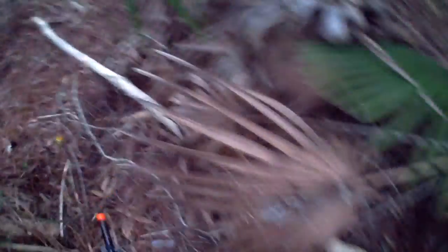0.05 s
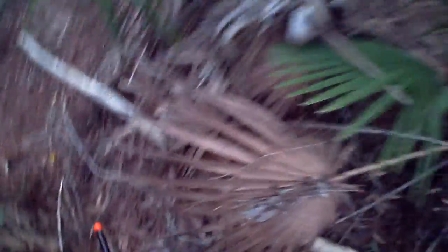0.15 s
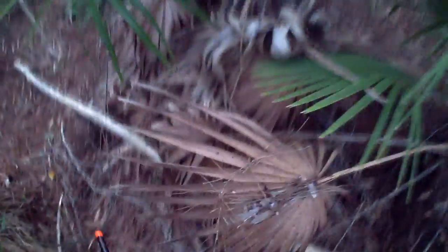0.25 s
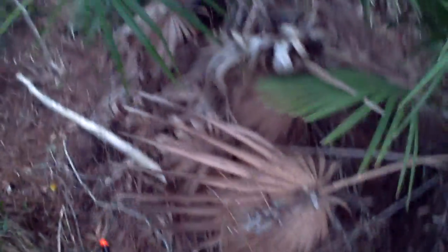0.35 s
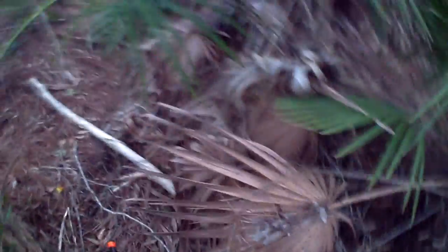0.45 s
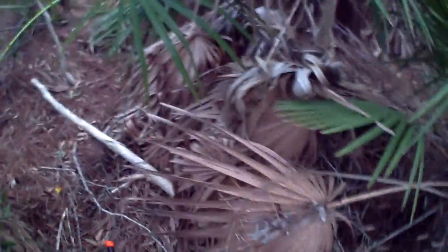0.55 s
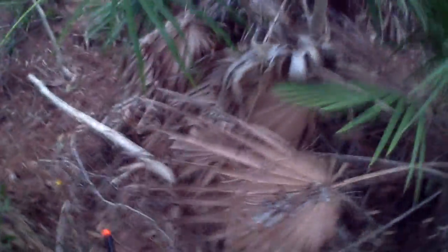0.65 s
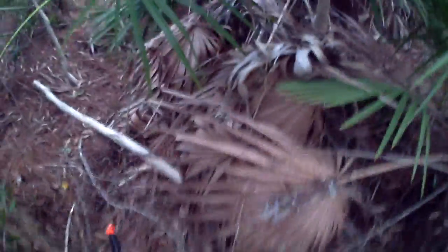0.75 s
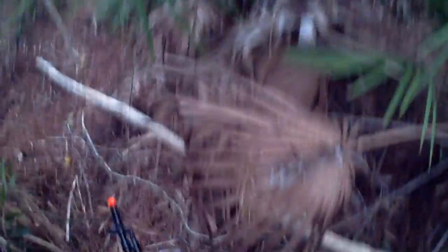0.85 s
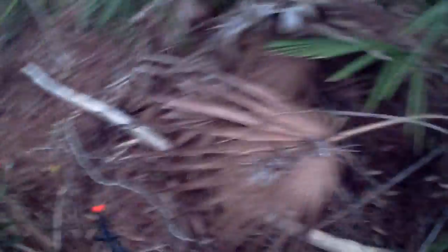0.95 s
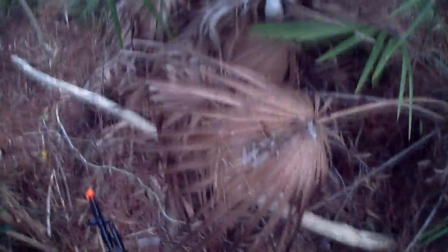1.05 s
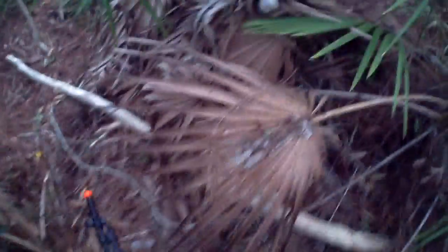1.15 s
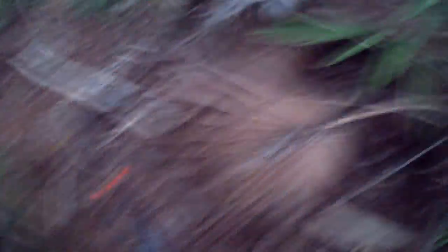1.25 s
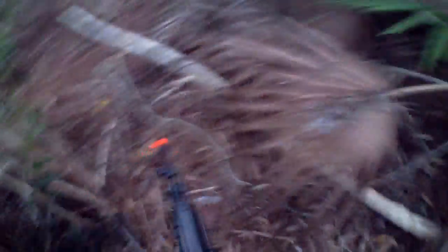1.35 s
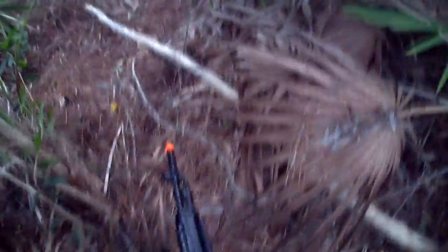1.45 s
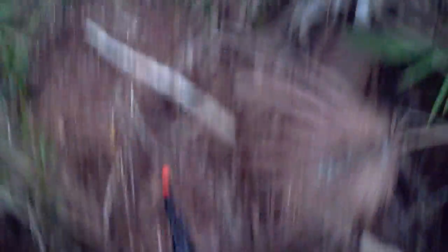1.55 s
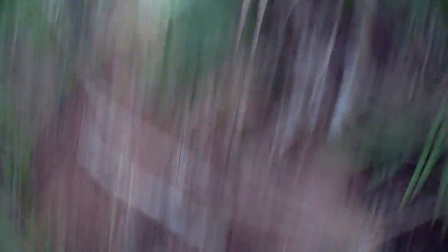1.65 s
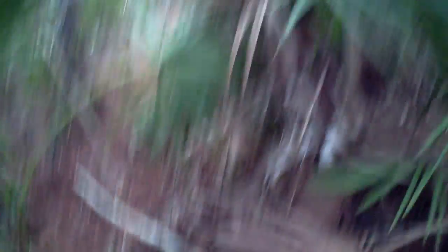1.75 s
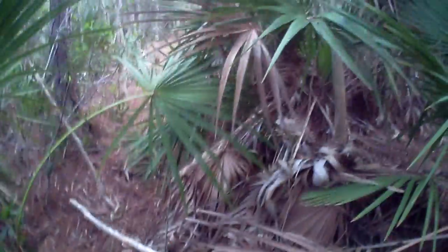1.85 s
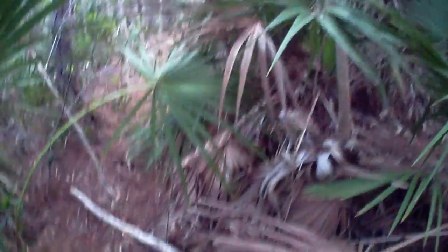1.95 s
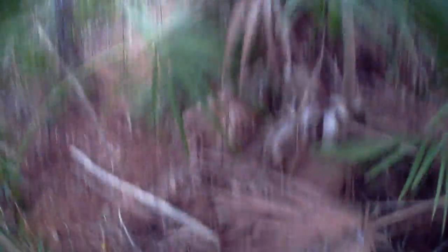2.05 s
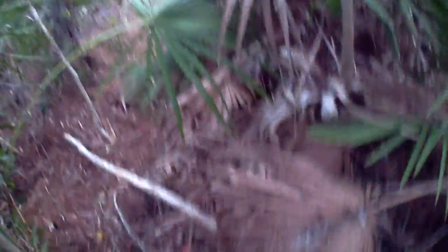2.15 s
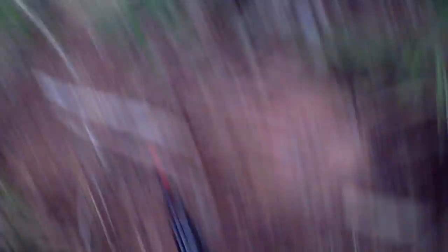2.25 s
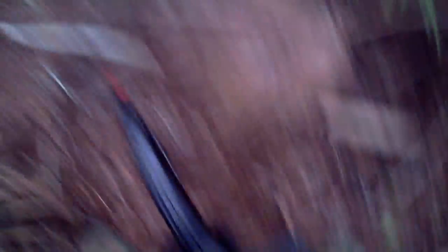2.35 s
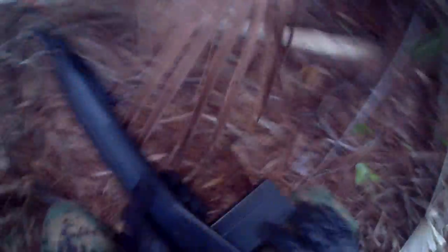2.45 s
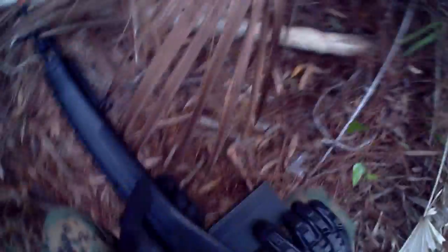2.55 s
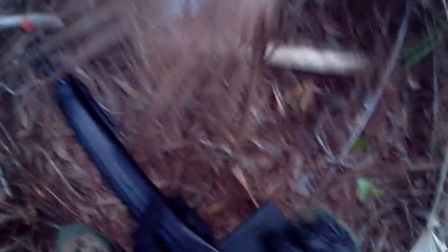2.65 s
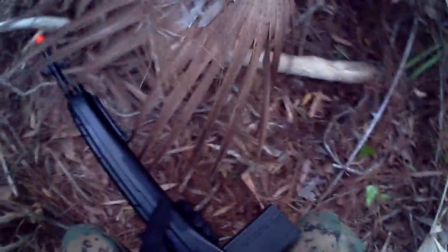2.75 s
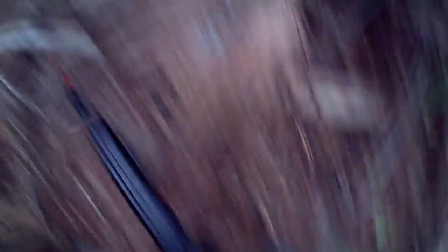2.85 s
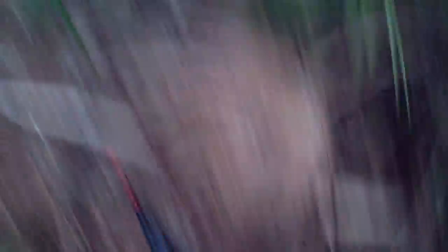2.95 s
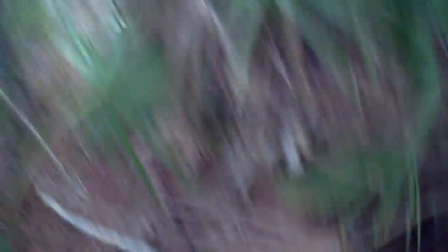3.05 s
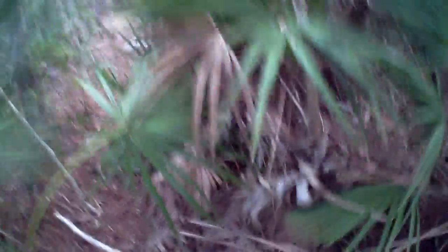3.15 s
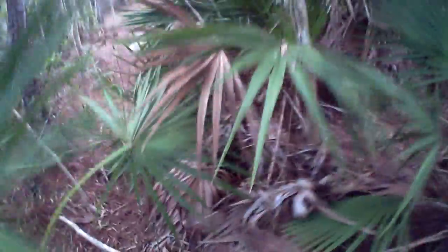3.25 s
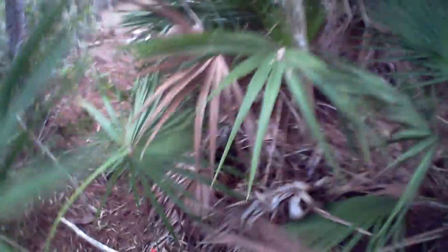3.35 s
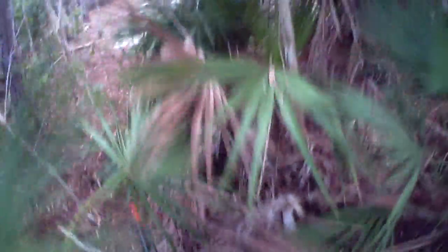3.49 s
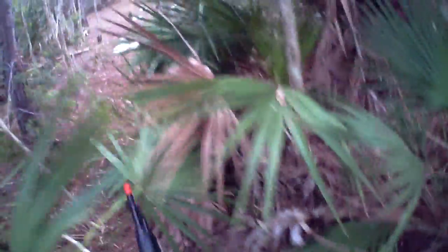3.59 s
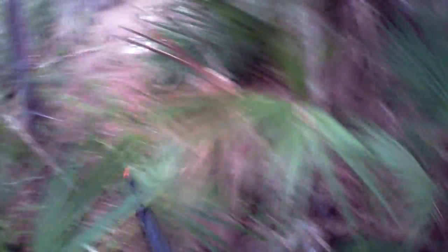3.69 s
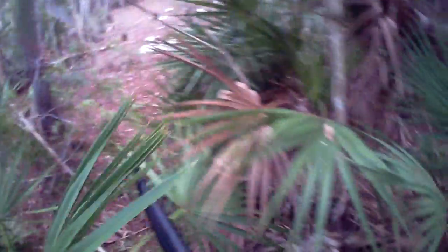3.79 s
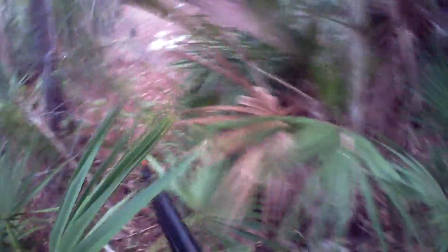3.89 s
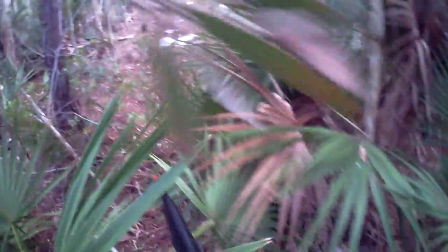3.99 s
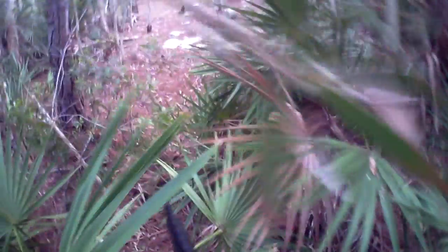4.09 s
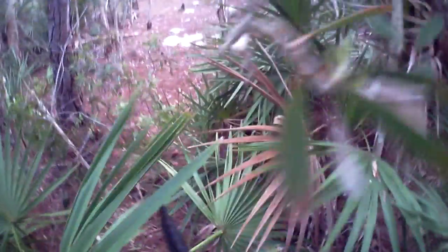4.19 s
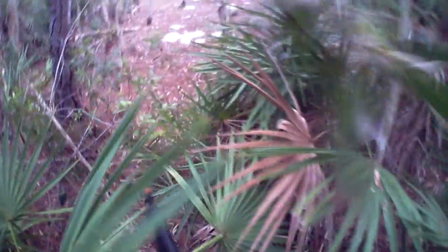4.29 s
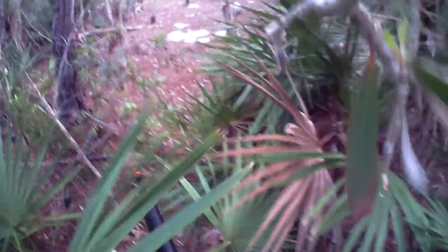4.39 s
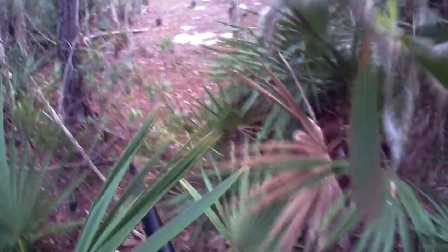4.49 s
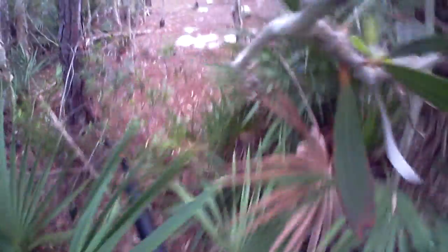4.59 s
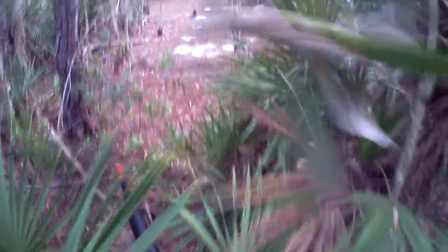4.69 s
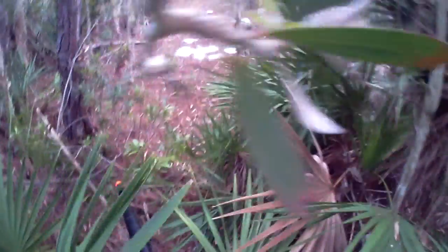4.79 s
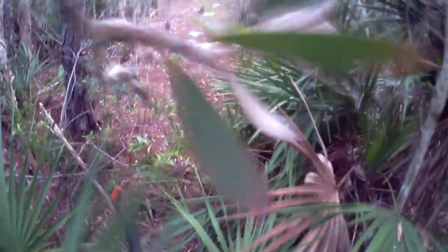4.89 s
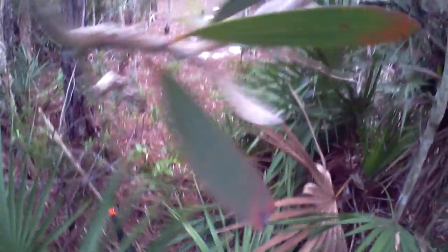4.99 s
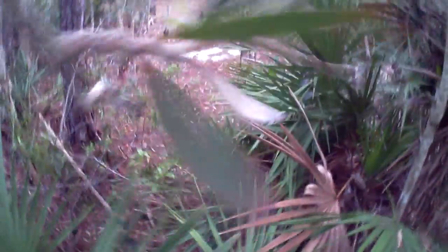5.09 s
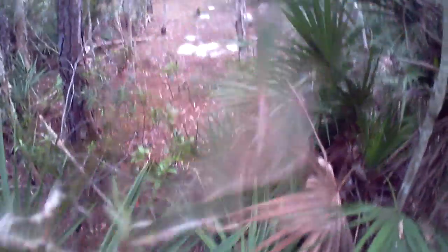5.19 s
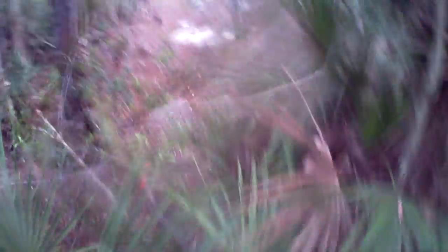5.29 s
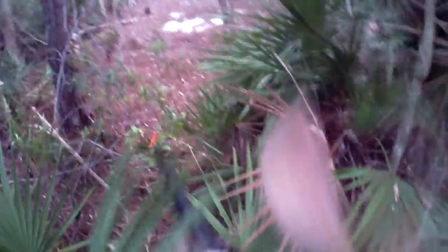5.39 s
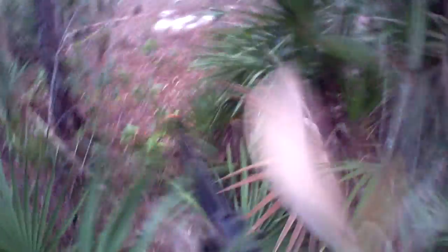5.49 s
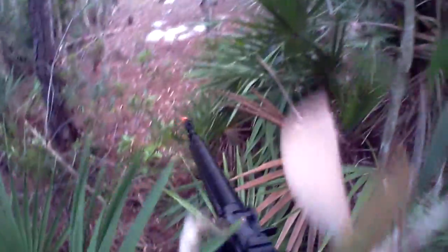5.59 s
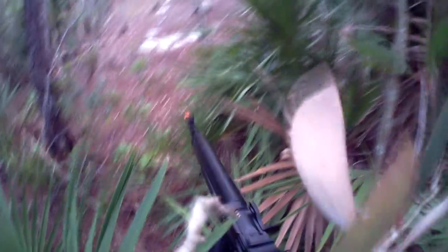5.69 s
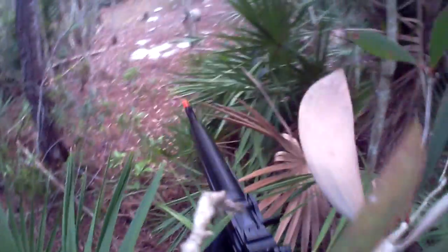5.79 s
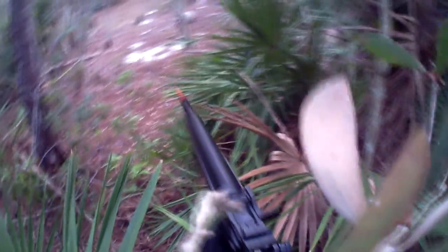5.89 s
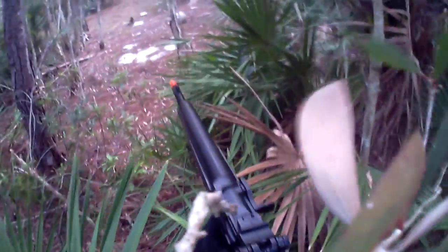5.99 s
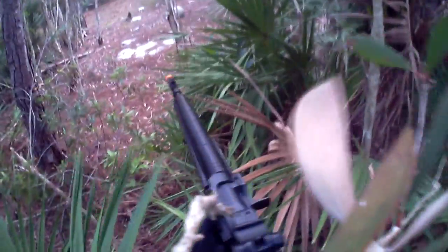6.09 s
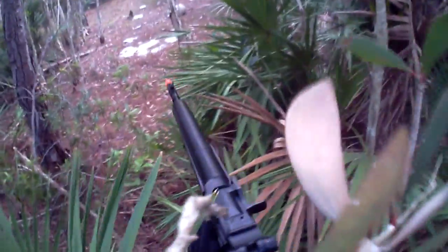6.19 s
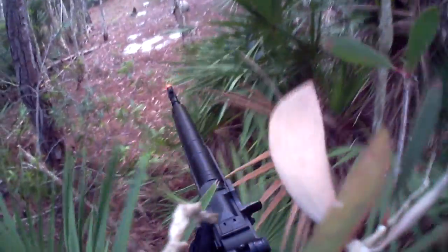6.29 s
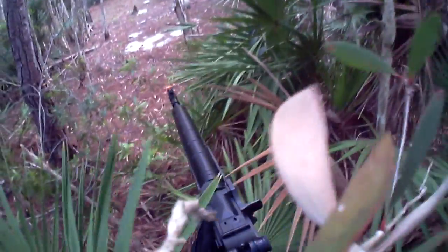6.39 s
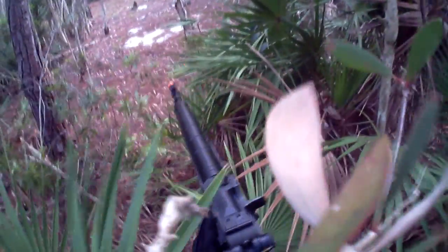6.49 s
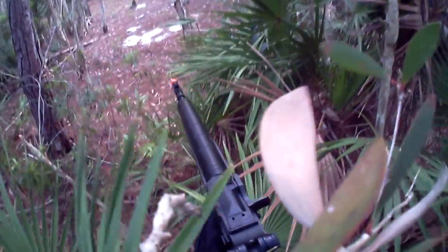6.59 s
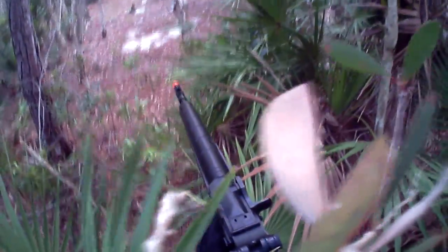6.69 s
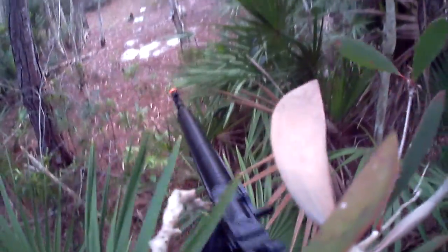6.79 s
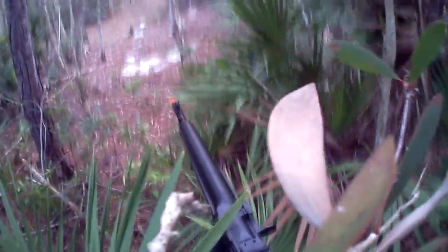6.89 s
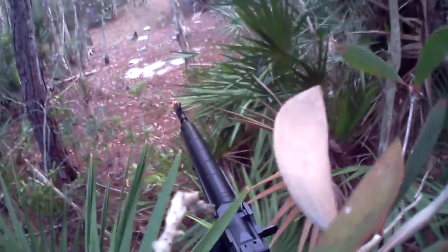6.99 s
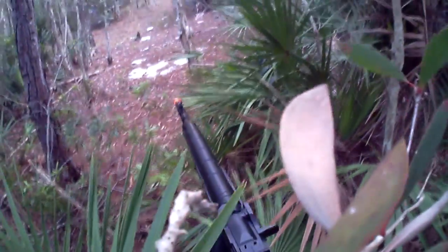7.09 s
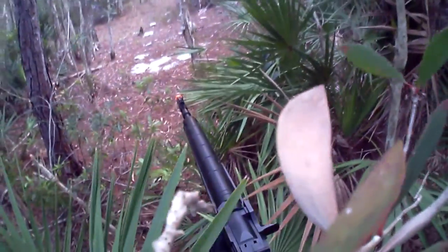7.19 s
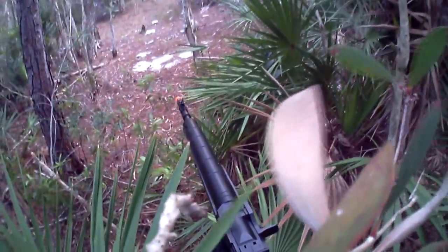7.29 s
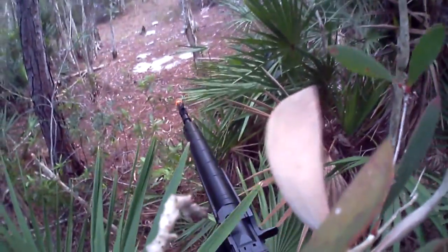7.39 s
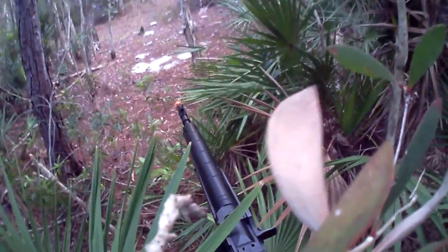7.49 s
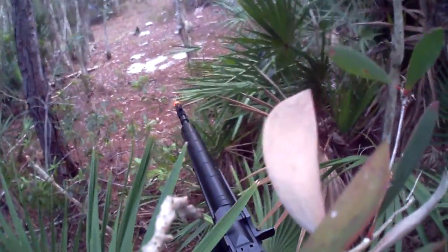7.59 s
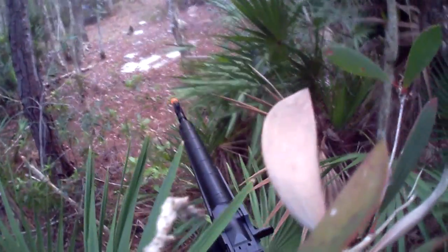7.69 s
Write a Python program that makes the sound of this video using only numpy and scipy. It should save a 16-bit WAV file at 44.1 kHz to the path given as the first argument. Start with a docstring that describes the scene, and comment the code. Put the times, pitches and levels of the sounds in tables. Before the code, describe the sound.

Dry palm fronds rustle, scrape and snap against a head-worn microphone as someone pushes through scrub, loudest just after five seconds, then quiet.

```python
"""Dry palm fronds rustle and scrape as someone pushes through scrub, close to a small head-worn camera:
fluttering noise rises and falls in strokes, mixed from dry leaf, dull brushing and low body sound.
Snaps are noise bursts and blows that ring the port, the stalks and the housing; thumps are damped swings.
Low noise rumbles on the microphone; a far cricket pulses over a steady hush and a faint hum."""
import sys
import numpy as np
from scipy import signal
from scipy.fft import rfft, irfft, next_fast_len
from scipy.io import wavfile
from scipy.ndimage import uniform_filter1d, map_coordinates

SR = 44100
rng = np.random.default_rng(int(sys.argv[2]) if len(sys.argv) > 2 else 0)


def wav_record(signal):
    """Record a signal, one row per channel, as 16-bit PCM in the file named by sys.argv[1]."""
    frames = np.transpose(np.atleast_2d(signal))
    bounded = np.clip(frames, -1, 1)
    # unit amplitude maps onto the largest positive 16-bit level
    quanta = np.round(bounded * 32767).astype(np.int16)
    wavfile.write(sys.argv[1], SR, quanta)


N = 341492

# How gritty the rubbing is. Each row: time in seconds, grit from 0 (smooth slide) to 1 (crackling).
GRITTY = [(0, .7), (2.2, .8), (2.4, .95), (3.2, .9), (3.35, .5), (4, .5), (4.3, .6), (4.55, .35), (5, .35),
          (5.1, 0.92), (5.45, 0.96), (5.7, .6), (6.7, .6), (7.74, .6)]


def amp(db):
    """dB to gain."""
    return 10 ** (np.asarray(db) / 20)


def unit(x):
    """Scaled to rms 1."""
    return x / np.sqrt(np.mean(x ** 2) + 1e-20)


def curves(rows):
    """One value per sample for each column after the time."""
    time_s, *columns = np.transpose(rows)
    return [np.interp(np.arange(N) / SR, time_s, column) for column in columns]


def wobble(rate_hz):
    """A smooth random curve with rate_hz knots a second."""
    knots = rng.standard_normal(int(N * rate_hz / SR) + 4)
    return map_coordinates(knots, [np.arange(N) * rate_hz / SR])


def filtered(x, response):
    """x times a response of frequency."""
    size = next_fast_len(N + 8192)
    spectrum = rfft(x, size) * response(np.fft.rfftfreq(size, 1 / SR))
    return irfft(spectrum, size)[..., :N]


def coloured(x, points):
    """x through (Hz, dB) points on a log frequency axis, rms 1."""
    point_hz, point_db = np.transpose(points)

    def response(hz):
        return amp(np.interp(np.log(hz + 1), np.log(point_hz + 1), point_db))
    return unit(filtered(x, response))


def ringing(x, modes):
    """x twice through causal resonances, for steep skirts; the power of white noise is kept."""
    def response(hz):
        one_pass = 0
        for k, (mode_hz, width_hz, db) in enumerate(modes):
            damping = 1j * hz * width_hz
            resonance = amp(db) * damping / (mode_hz ** 2 - hz ** 2 + damping)
            one_pass = one_pass + (-1) ** k * resonance  # neighbours alternate in sign
        two_passes = one_pass ** 2
        return two_passes / np.sqrt(np.mean(np.abs(two_passes) ** 2))
    return filtered(x, response)


def rustle():
    """Leaves sliding on leaves and housing; the layers flutter together as contact comes and goes."""
    # How close the leaves rub. Each row: time in seconds, 0 (arm's length) to 1 (on the housing).
    closeness = [(0, 0.64), (.8, 0.58), (.92, .02), (2.2, 0.042), (3.9, 0.12), (4.1, 1), (5.95, 0.84),
                 (6.5, 0.36), (6.65, 0.053), (7.74, 0.29)]
    # Spectra of dry leaf on the port, dry leaf at arm's length, brushed green leaf and cloth,
    # and low body sound. Each row: frequency in Hz, relative density in dB per Hz.
    port_leaf = [(1760, -43), (3000, -18), (3790, -15.5), (6340, -14), (7590, -4), (10900, -8),
                 (13300, -11), (15500, -24)]
    far_leaf = [(1500, -26.5), (3000, -7), (7000, 1), (11000, -1.5), (15000, -13.5), (16000, -33.5)]
    brushing = [(180, -38), (300, -7.5), (706, -2), (796, -1.5), (1310, -4.5), (1680, -7.5), (4000, -13),
                (5200, -21), (8800, -120)]
    low_body = [(60, -32.5), (90, 0), (130, 0), (200, -8.5), (420, -11.5), (600, -32.5)]

    crisp_db, dull_db = strokes()
    close = np.clip(curves(closeness)[0], 0, 1)
    flutter_db = 3.15 * wobble(45) + 0.66 * wobble(130)
    gritty = np.clip(curves(GRITTY)[0], 0, 1)
    flutter_db = gritty * flutter_db

    smooth = np.sqrt(1 - gritty ** 2) * rng.standard_normal(N)
    crackling = gritty * unit(grit(150, spread_db=4.5, t60_s=0.02))
    dry_leaf = patchy(amp(flutter_db) * (smooth + crackling), depth_db=3.2)
    crisp = close * coloured(dry_leaf, port_leaf) + (1 - close) * coloured(dry_leaf, far_leaf)

    dull = coloured(amp(flutter_db) * grit(60, spread_db=2.5, t60_s=0.044), brushing)
    body_flutter_db = 0.2 * flutter_db + 3.6 * wobble(18)
    body = coloured(amp(body_flutter_db) * rng.standard_normal(N), low_body)
    body_over_dull_db = 13.66 * close - 6.5
    return amp(crisp_db) * crisp + amp(dull_db) * (dull + amp(body_over_dull_db) * body)


def strokes():
    """Levels in dB of the dry rustle and of the brushing: each stroke swells and fades over the stirring."""
    # Leaves dragging past. Each row: peak time in seconds, dry rustle level in dB, duller brushing
    # level in dB, swell in seconds, fade in seconds; swell and fade span 20 dB of the dry rustle.
    drags = [(0, -72, -63, .1, .3), (.46, -74, -62.5, .15, .2), (.7, -75, -66.5, 0.18, .15),
             (.97, -70, -56.5, .2, .1), (1.035, -62.5, -51.5, 0.11, .06), (1.373, -57, -60, 0.051, .16),
             (1.53, -62, -59, 0.22, 0.43), (2.019, -50, -56, .09, .09), (2.23, -55.5, -54, 0.034, .12),
             (2.331, -42, -53.5, .05, .25), (2.465, -35, -42.5, .12, .18), (2.566, -43, -49, .2, .15),
             (2.75, -45.5, -49.5, .22, .3), (2.888, -40, -47.5, .25, 0.13), (2.98, -37, -44.5, .06, .045),
             (3.02, -50, -56, 0.037, 0.13), (3.172, -49, -53, .09, .5), (3.437, -41.5, -47, .3, .3),
             (3.734, -47, -51, .5, .22), (4.06, -55.5, -57.5, .35, .1), (4.127, -30.5, -42.5, .032, .07),
             (4.181, -34.5, -68, .15, .016), (4.238, -38, -51, .016, .1), (4.285, -38, -49, .1, .075),
             (4.516, -43.5, -52.5, .07, .4), (4.672, -32.5, -50.5, .14, .2), (4.764, -45, -57.5, .2, 0.046),
             (4.84, -39, -52, .06, .2), (4.889, -41.5, -54.5, .15, .05), (4.993, -40, -52, .13, .12),
             (5.155, -28, -51, .05, .07), (5.2, -32, -51, 0.062, .07), (5.257, -36, -37, .2, .15),
             (5.331, -18, -40, .09, .03), (5.37, -40, -41.5, 0.054, .11), (5.54, -41, -48, .02, .11),
             (5.72, -43.5, -48.5, .18, .25), (5.515, -50, -48.5, .012, .015), (5.82, -48, -55, .15, 0.048),
             (5.927, -49, -52.5, .1, .12), (6.44, -65, -58.5, .15, .1), (6.782, -42, -46.5, .15, .13),
             (6.95, -59.5, -60, .2, .15), (7.432, -61.5, -67.5, .06, .4)]
    roundness = 0.99  # 1 pointed, 2 round
    dull_swing = 0.82  # share of the dry swing in dB that the brushing follows
    stir_dry_db, stir_dull_db = -70, -67.5  # faint stirring between strokes

    t = np.arange(0, N + 64, 32) / SR
    peak_s, dry_db, dull_db, swell_s, fade_s = np.transpose(drags)[..., None]
    distance = np.where(t < peak_s, (peak_s - t) / swell_s, (t - peak_s) / fade_s)
    down_db = 20 * distance ** roundness
    dry_power = amp(stir_dry_db) ** 2 + (amp(dry_db - down_db) ** 2).sum(0)
    dull_power = amp(stir_dull_db) ** 2 + (amp(dull_db - dull_swing * down_db) ** 2).sum(0)
    return [np.interp(np.arange(N) / SR, t, 10 * np.log10(power)) for power in (dry_power, dull_power)]


def grit(per_second, spread_db, t60_s):
    """Noise plus tiny fibre breaks: dense random puffs of uneven size, and sharper ticks."""
    t = np.arange(SR // 20) / SR
    happens = rng.random((2, N)) < per_second / SR
    breaks = happens * amp(spread_db * rng.standard_normal((2, N)))
    decays = [amp(-60 * t / t60_s), 2.5 * amp(-60 * t / 0.005)]  # puff, sharper tick
    envelope = 1 + signal.fftconvolve(breaks, decays, axes=1)[:, :N].sum(0)
    return envelope * rng.standard_normal(N)


def patchy(x, depth_db):
    """Each leaf has its own colour: gain varies in patches of about 1 kHz by 15 ms."""
    z = signal.stft(x, nperseg=128)[2]
    field = uniform_filter1d(rng.standard_normal(z.shape), size=4, axis=0)
    field = uniform_filter1d(field, size=9, axis=1)
    return signal.istft(z * amp(depth_db * unit(field)), nperseg=128)[1][:N]


def snaps():
    """Short contacts crack at once, long ones scrape in and stop; each rings port, stalk and housing."""
    # The clearest frond contacts. Each row: start in seconds, nominal crackle level in dB, length in
    # seconds, stalk in dB above crackle, knock in dB above crackle, stalk's strongest pitch in Hz.
    contacts = [(0.889, -58.0, 0.004, 3.5, 13, 1720), (1.5846, -59, 0.003, 9, 20, 1880),
                (2.215, -44.0, 0.015, -11, -5, 1760), (2.2164, -20, 0.0007, -17.5, -14, 1880),
                (2.3075, -37.5, 0.011, -14.0, -21, 4080), (2.3421, -25, 0.0007, -25, -28, 4500),
                (2.357, -26, 0.00076, -25, -21, 4500), (2.3925, -37, 0.0017, -4.0, -16.0, 2265),
                (2.4473, -27.5, 0.0007, -4.5, -7, 3420), (2.4793, -21, 0.0027, -10, -38, 4540),
                (2.5126, -35, 0.02, -6.0, -0.5, 2630), (2.5132, -22, 0.0007, -5, -5, 2730),
                (2.5272, -10, 0.0007, -20, -15.5, 3310), (2.6135, -43.5, 0.0012, 5.0, -12, 3970),
                (2.6713, -49.5, 0.0017, 10.0, -7.0, 2490), (2.7102, -32, 0.0007, -7, -7, 4480),
                (2.7242, -39, 0.0027, -2.0, -5, 2990), (2.7711, -26, 0.0007, -22, -9, 3370),
                (2.7936, -42, 0.0022, 9, 12, 1290), (2.8675, -41, 0.018, -25.0, -23.0, 2290),
                (2.8933, -32.5, 0.0042, -1.5, -28, 1980), (3.0081, -39, 0.0031, -22, -11, 5000),
                (3.147, -45, 0.013, -3.0, -12, 2190), (3.1812, -37, 0.0017, -16, -8, 5000),
                (3.2166, -45.5, 0.0032, 5.5, -6, 3500), (3.247, -50, 0.003, 8, 2, 1800),
                (3.403, -45, 0.019, -6.0, -11, 2290), (3.874, -47.5, 0.017, -5.5, -9.0, 1890),
                (4.0841, -39, 0.0007, -5.0, -19.0, 2630), (4.1029, -26, 0.022, -6.0, 6.0, 1510),
                (4.1051, -2.5, 0.0007, -21.0, -19, 3500), (4.1116, -14.5, 0.0027, -9.5, -15, 1310),
                (4.117, -11, 0.0007, -23, -24, 1410), (4.1195, -9, 0.0007, -32.0, -2, 1300),
                (4.1235, -12, 0.0007, -22.0, -12, 1250), (4.1949, -11, 0.0017, -14.0, -31, 2930),
                (4.199, -39, 0.009, -10.0, -15, 2720), (4.2323, -31, 0.0007, -5.0, -12, 3080),
                (4.2626, -31, 0.019, -29.0, -30, 2380), (4.5675, -27.5, 0.0012, -4.0, -26.0, 3900),
                (4.5968, -30, 0.012, -12, -23, 1520), (4.5975, -23, 0.0012, 0.5, 0, 1470),
                (4.6598, -13, 0.0007, -23, -38, 3160), (4.9185, -34.5, 0.017, -13, -4.5, 1390),
                (5.0025, -20, 0.0012, -7.5, -35, 3920), (5.072, -36, 0.017, -23.0, -20, 2840),
                (5.0938, -13, 0.0007, -15.5, -15.5, 2020), (5.1264, -24.5, 0.01, -12.0, -17.0, 2840),
                (5.1497, -22, 0.014, -18.0, -23.5, 4270), (5.1572, -18.5, 0.0047, -19.0, -29.0, 4870),
                (5.162, -22, 0.0007, -18, -35, 4000), (5.1736, -1.5, 0.0017, -13.0, -26, 3880),
                (5.2101, -2.5, 0.0012, -16.0, -27, 3570), (5.2315, -13, 0.0017, -22.0, -33, 5050),
                (5.2452, -20.5, 0.014, -18.0, -11.5, 2090), (5.248, -9.5, 0.0012, -22.0, -28, 4750),
                (5.2575, -13, 0.0007, -2.5, -4, 1660), (5.2685, -24.0, 0.0012, -7.0, -4.5, 2720),
                (5.2784, -19.5, 0.0012, -11.0, -12, 2450), (5.2899, -22, 0.0057, -26.0, -35.0, 2696),
                (5.3048, -8.5, 0.0022, -14.0, -9.5, 2300), (5.3076, -10, 0.014, -23, -25, 4420),
                (5.3323, -8, 0.0017, -15.0, -10.5, 3620), (5.3458, -21.5, 0.0007, -14.5, -4.0, 2180),
                (5.3507, -7, 0.0032, -15.5, -16.5, 3890), (5.3797, -13.5, 0.0007, -6.0, -16, 4120),
                (5.3978, -26, 0.019, -14.5, -40.0, 2270), (5.4006, -13, 0.0012, -29.5, -33, 2840),
                (5.4116, -16, 0.0007, -19.0, -28, 1310), (5.4425, -31.5, 0.0007, -28.0, -7, 5300),
                (5.452, -29, 0.0007, -26.0, -19.0, 2370), (5.4645, -39, 0.0007, -16.0, 0, 2100),
                (5.5079, -22.5, 0.0007, -22, -25, 3490), (5.5498, -23.5, 0.0007, -3.0, -29, 2970),
                (5.6695, -32.5, 0.0007, 6.0, 2, 3530), (5.6801, -35, 0.01, -13, -13, 2720),
                (5.7259, -29, 0.0017, -2, -20, 2480), (5.911, -46.5, 0.012, -2.0, 3, 1400),
                (6.2143, -47.0, 0.0022, -14.5, -29, 3970), (6.2362, -52.0, 0.0017, -17.0, -18, 3430),
                (6.2617, -38.5, 0.0012, -14.0, -24.0, 3640), (6.2911, -38, 0.0012, -17, -14.5, 2350),
                (6.3111, -36.5, 0.0007, -15, -19.0, 1810), (6.4198, -25, 0.0012, -20.5, -32, 3020),
                (6.4263, -45, 0.0007, -16, -17, 2730), (6.4388, -25.5, 0.0017, -15.5, -33.0, 2130),
                (6.4547, -26.5, 0.0007, -19.5, -23, 1800), (6.5755, -24.5, 0.0007, -19.5, -30, 3900),
                (6.619, -49.5, 0.01, -11.0, -11, 2610), (7.0037, -50.5, 0.018, -9.5, -3.5, 2320)]
    # Resonances. Each row: centre in Hz, width in Hz per pass, gain in dB
    # (relative and per pass for port and housing; applied once after ringing for stalks).
    port_modes = [(8080, 3700, 5.5), (13800, 9600, -1.5)]
    stalk_modes = [(1975, 1500, 3), (4048, 410, 2.5), (1250, 1000, -3), (5300, 1400, 5)]
    housing_modes = [(297, 590, 4.5), (538, 323, 12), (953, 400, 6)]
    struck_db_per_octave = 5  # stalk modes weaken away from the strongest pitch

    t = np.arange(SR // 16) / SR
    drive = np.zeros((2 + len(stalk_modes), N + SR))  # port, housing, then each stalk mode
    modes_hz = np.transpose(stalk_modes)[0]
    for start_s, db, length_s, stalk_db, knock_db, stalk_hz in [*contacts, *ticks()]:
        rise = 1 - np.exp(-(t + 1 / SR) / (0.5 * length_s))
        settling = 0.097 * np.exp(-t / 0.0058)
        shape = rise * np.exp(-(t / length_s) ** 3) + settling
        size = np.linalg.norm(shape)
        burst = shape * rng.standard_normal(len(t)) * amp(2.0 * rng.standard_normal(len(t)))
        burst *= size / np.linalg.norm(burst)

        # short breaks act as one blow on the slower bodies
        sudden = np.exp(-(length_s / 0.0039) ** 2)
        blow = np.sqrt(1 - sudden ** 2) * burst - sudden * size * (t == 0)

        # each stalk is struck at another spot
        spot_db = 2.1 * rng.standard_normal(len(stalk_modes))
        octaves_away = np.abs(np.log2(modes_hz / stalk_hz))
        struck_db = stalk_db + spot_db - struck_db_per_octave * octaves_away

        start = round(start_s * SR)
        at = slice(start, start + len(t))
        drive[0, at] += amp(db) * (0.92 * burst + 0.6 * blow)
        drive[1:, at] += amp(db + np.r_[knock_db, struck_db])[:, None] * blow

    stalk = sum(amp(db) * ringing(x, [(hz, width_hz, 0)])
                for x, (hz, width_hz, db) in zip(drive[2:], stalk_modes))
    port = patchy(ringing(drive[0], port_modes), depth_db=1.1)
    return port + ringing(drive[1], housing_modes) + stalk


def ticks():
    """Contact rows for snaps(): small random breaks crowd where the rustle is strong and gritty."""
    count = 45
    crowding = 0.57  # on the rustle's level in dB
    over_rustle_db, level_spread_db = 8, 3
    median_s = 0.0014
    stalk_db, knock_db, colour_spread_db = -19, -18, 7  # medians above crackle; scatter of both
    median_hz, spread_octaves = 2700, 0.65  # strongest stalk pitch

    dry_db = strokes()[0]
    gritty = np.clip(curves(GRITTY)[0], 0, 1)
    share = np.cumsum(amp(crowding * dry_db) * gritty ** 2)
    picks = (np.arange(count) + rng.random(count)) / count
    at = np.searchsorted(share, share[-1] * picks).clip(0, N - 1)
    u = rng.standard_normal((count, 5))
    return np.c_[at / SR,
                 dry_db[at] + over_rustle_db + level_spread_db * u[:, 0],
                 median_s * np.exp(0.5 * u[:, 1]),
                 stalk_db + colour_spread_db * u[:, 2],
                 knock_db + colour_spread_db * u[:, 3],
                 median_hz * 2 ** (spread_octaves * u[:, 4])]


def thumps():
    """Soft pushes on the housing: one low, quickly damped swing."""
    # Each row: start in seconds, level in dB before onset and decay, pitch in Hz, 60 dB decay in seconds.
    pushes = [(1.58, -35.5, 199, 0.026), (1.739, -32.5, 120, 0.2), (1.87, -26.5, 183, 0.026),
              (4.106, -21.5, 125, 0.064), (4.11, -15, 332, 0.058), (4.197, -27.5, 120, .1),
              (4.65, -33, 99, .088), (4.93, -36, 855, 0.084), (5.105, -18.5, 118, 0.086),
              (5.235, -17.5, 82, 0.12), (5.302, -20, 65, .1), (5.345, -21.5, 120, 0.079),
              (5.347, -27, 429.6, .07), (5.428, -33, 450, 0.076), (5.576, -33.5, 444, .092),
              (5.661, -33, 130, 0.11), (5.724, -33, 450, .064), (5.91, -35, 457, 0.043)]
    out, t = np.zeros(N + SR), np.arange(SR // 3) / SR
    for start_s, db, hz, t60_s in pushes:
        onset = 1 - np.exp(-t / 0.0022)
        swing = np.sin(2 * np.pi * hz * t) * onset
        out[round(start_s * SR):][:len(t)] += amp(db - 60 * t / max(t60_s, 0.01)) * swing
    return out[:N]


def air():
    """Lumpy air and body movement on the microphone: low noise with a wavering level."""
    # Each row: time in seconds, rumble level in dB.
    levels = [(0.0, -40.5), (0.11, -39.5), (0.15, -48), (0.21, -36.5), (0.62, -47), (1.77, -44),
              (2.18, -51), (2.41, -42.5), (2.63, -51.5), (2.98, -39.5), (3.99, -52.5), (4.01, -48.5),
              (5.13, -45), (5.3, -29), (5.39, -45.5), (6.1, -51), (7.72, -49.5), (7.74, -56.5)]
    # Each row: frequency in Hz, relative density in dB per Hz.
    rumble_spectrum = [(8.8, -33.5), (15, 0), (46, -4), (130, -22), (170, -67), (290, -120)]
    rumble_db, = curves(levels)
    lumpy = amp(0.8 * wobble(15)) * rng.standard_normal(N)
    return amp(rumble_db) * coloured(lumpy, rumble_spectrum)


def forest():
    """Steady filtered-noise hush, a cricket tone gated in pulses and a faint wavering hum."""
    # Forest and microphone hiss. Each row: frequency in Hz, relative density in dB per Hz.
    hush_spectrum = [(59, -31), (100, -9), (235, -7.5), (665, -8), (1500, -21.5), (2800, -31.5),
                     (6440, -27), (7140, -31.5), (10200, -24), (13300, -32), (14500, -68.5)]
    # Each row: time in seconds, hum level in dB.
    hum_levels = [(0, -70), (.3, -73), (.5, -68), (.72, -68), (.85, -77), (1.15, -71), (1.5, -77),
                  (7.74, -78)]
    hush_db, hum_hz = -60, 389
    cricket_hz, cricket_rate_hz, cricket_db = 7170, 30, -76.5

    t = np.arange(N) / SR
    pulse_phase = 2 * np.pi * cricket_rate_hz * t + 0.8 * wobble(1.4)
    pulses = np.clip(np.sin(pulse_phase) + 0.3, 0, 1)
    cricket = unit(pulses * amp(2.3 * wobble(20)) * np.sin(2 * np.pi * cricket_hz * t + 0.6 * wobble(36)))
    hum = unit(amp(4 * wobble(4.6)) * np.sin(2 * np.pi * hum_hz * t + 1.6 * wobble(24)))
    hush = coloured(rng.standard_normal(N), hush_spectrum)
    return amp(hush_db) * hush + amp(cricket_db) * cricket + amp(curves(hum_levels)[0]) * hum


def scene():
    """All sources at the single microphone."""
    return (rustle() + snaps() + thumps() + air() + forest())[None]


def record(dry):
    """Peaks saturate towards full scale; the top fades steeply into the band limit."""
    fade_start_hz, cutoff_hz, hz_per_db = 15300, 16650, 45
    saturated = dry / (1 + np.abs(dry) ** 6) ** (1 / 6)

    def band_limit(hz):
        fade_db = -np.clip(hz - fade_start_hz, 0, None) / hz_per_db
        return amp(fade_db) * (hz < cutoff_hz)
    return filtered(saturated, band_limit)


dry = scene()
out = record(dry)
wav_record(out)
```